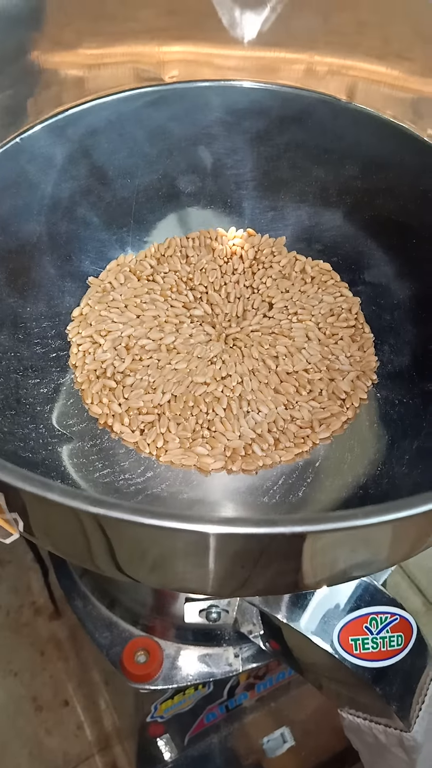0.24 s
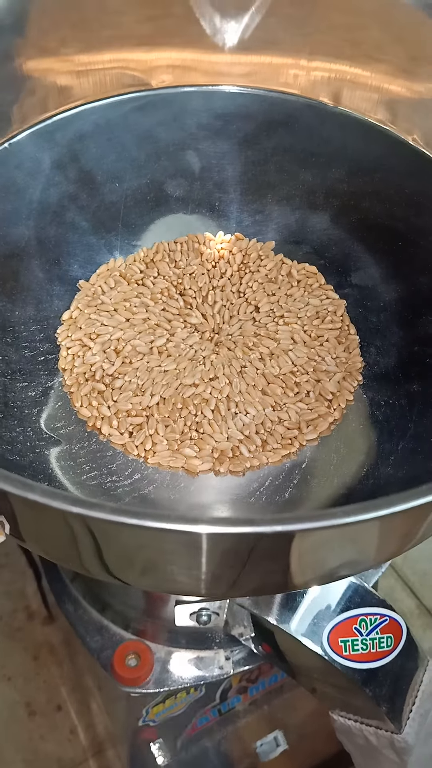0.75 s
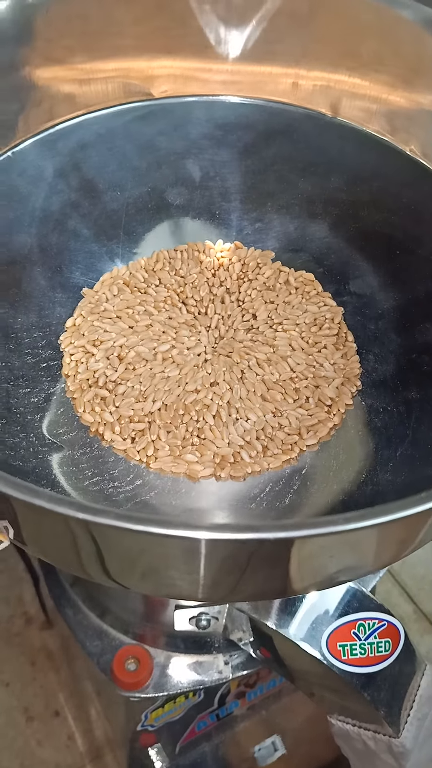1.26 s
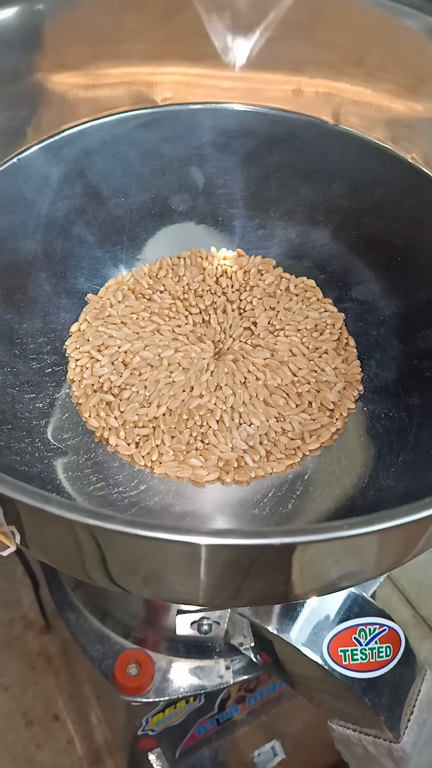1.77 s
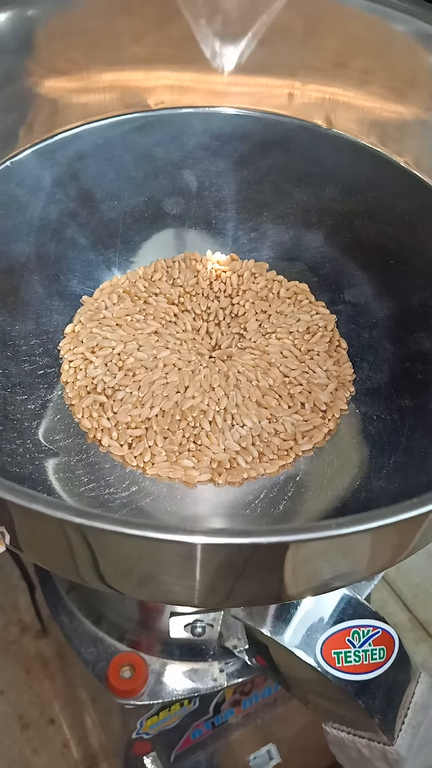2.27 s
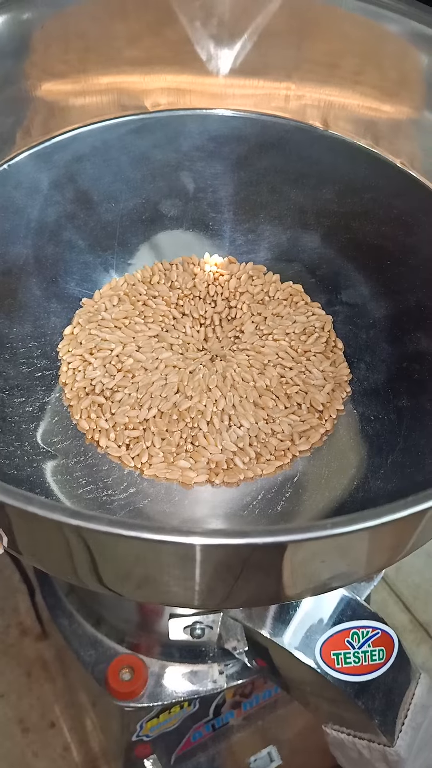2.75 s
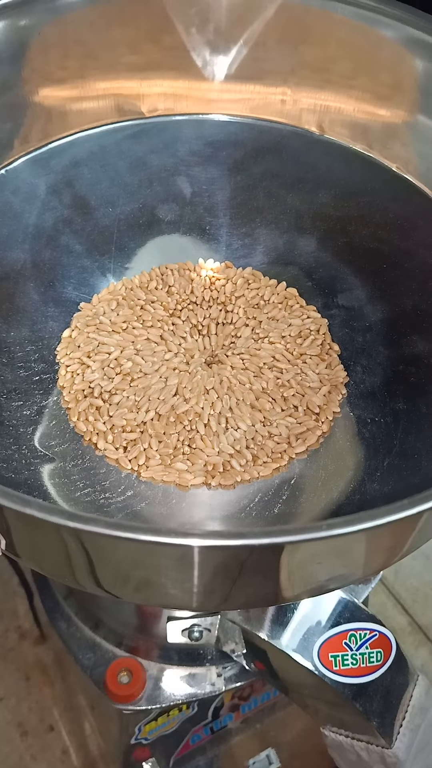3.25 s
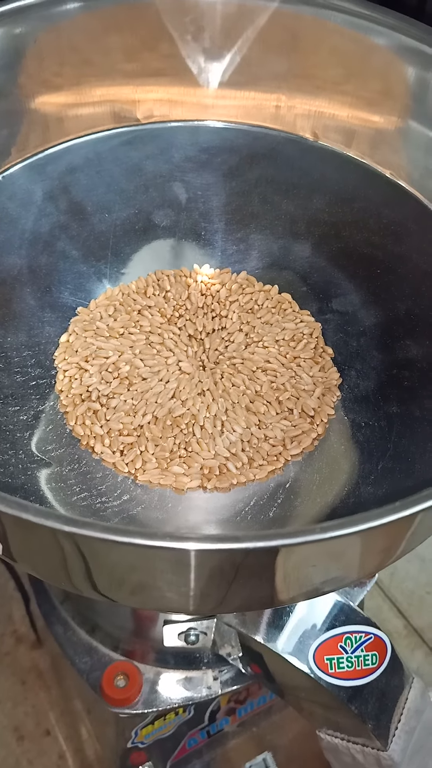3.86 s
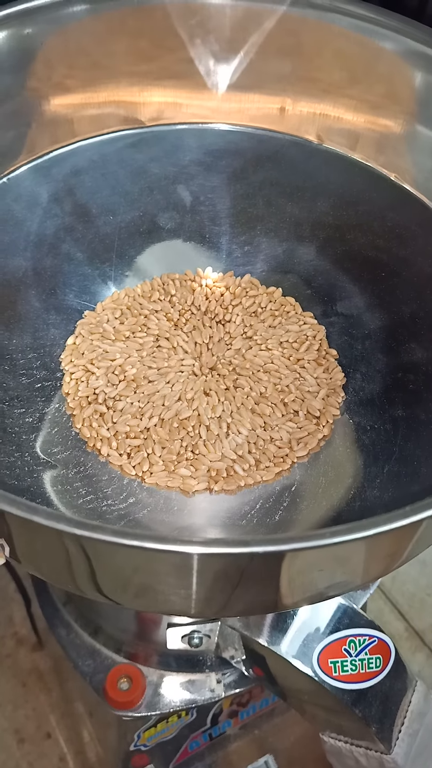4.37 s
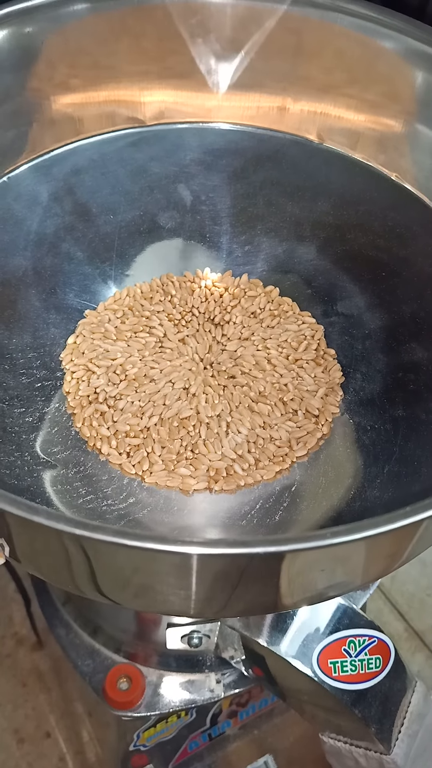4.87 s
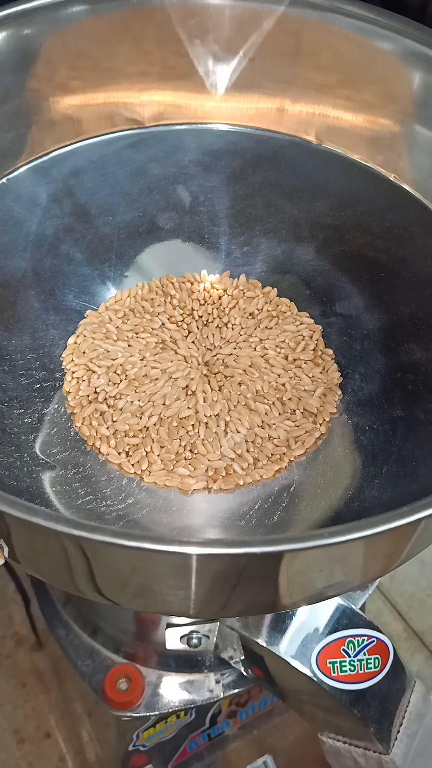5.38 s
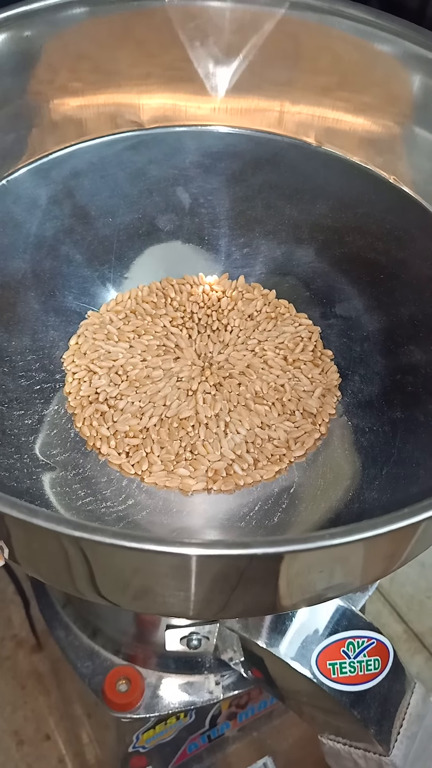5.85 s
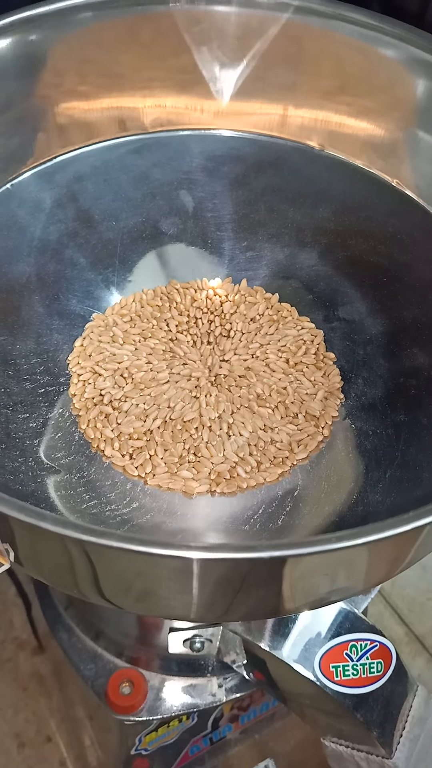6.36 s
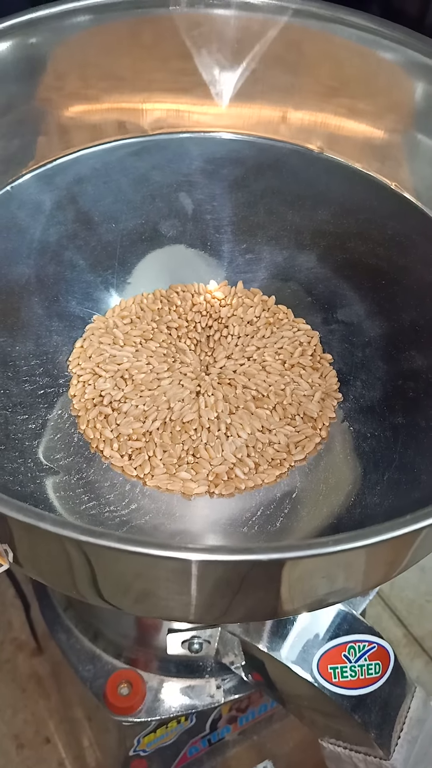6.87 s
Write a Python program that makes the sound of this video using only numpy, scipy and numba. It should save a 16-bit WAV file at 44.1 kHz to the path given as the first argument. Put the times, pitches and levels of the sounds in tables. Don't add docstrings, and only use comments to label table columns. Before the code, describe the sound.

A small electric grain mill runs steadily indoors, a hollow mid-low roar with metallic ringing, gritty hiss, dull knocks and faint crackles.

```python
import sys
import numpy as np
from scipy import signal
from scipy.fft import rfft, irfft
from scipy.io import wavfile
from scipy.ndimage import uniform_filter1d
from numba import njit

SR = 44100
rng = np.random.default_rng(int(sys.argv[2]) if len(sys.argv) > 2 else 0)


def unload_wav(signal):
    wavfile.write(
        sys.argv[1],
        SR,
        np.round(np.clip(np.atleast_2d(signal).T, -1, 1) * 32767).astype(np.int16),
    )


def nominal_scale(level):
    x = np.asarray(level, float) / 20
    return 10 ** x


N = 314022

# time_s, load_db (about the mean)
LOAD_CURVE = [(0.0, 0.5), (0.36, -0.8), (0.7, 0), (1.15, -0.2), (1.9, 0.7), (2.5, 0), (2.72, 1.5),
              (2.96, -1), (3.16, 0), (3.9, -0.4), (4.36, 0.8), (4.58, 0.3), (5.15, 0.7), (5.5, -0.2),
              (6.15, -0.4), (6.54, 0.7), (6.72, -2), (7.12, -0.8)]
# pitch_hz, width_hz, left_level_db, right_level_db,
# right_lead_rad, port_share_0_to_1 (motion common to both ports)
CHAMBER_MODES = [(254, 26, -56.5, -59.6, -0.1, 1.0), (295, 30, -49.0, -46.0, 0.2, 1.0),
                 (335, 24, -38.6, -40.2, 0.1, 0.88), (380, 36, -38.3, -47.3, -0.5, 0.89),
                 (432, 40, -35.8, -45.6, -0.4, 1.0), (474, 42, -38.2, -42.1, -0.5, 1.0),
                 (511, 32, -36.7, -39.1, -1.6, 1.0), (549, 27, -35.1, -59.9, -0.9, 1.0),
                 (582, 30, -32.7, -39.7, -0.9, 0.87), (646, 53, -45.4, -51.6, 0.7, 0.66),
                 (693, 31, -62.8, -53.4, -1.5, 1.0), (754, 71, -52.6, -56.0, 2.2, 0.18),
                 (799, 20, -52.8, -52.3, 0.3, 0.71), (845, 101, -56.1, -61.4, 0.1, 1.0),
                 (931, 111, -53.5, -56.3, 2.4, 0.25)]
HOPPER_MODES = [(1043, 118, -56.1, -56.3, -2.2, 0.43), (1112, 26, -60.6, -76.0, 0.3, 1.0),
                (1242, 31, -60.5, -63.8, 0.9, 1.0), (1315, 135, -55.2, -54.9, -3.0, 0.44),
                (1366, 35, -58.2, -56.0, 1.1, 0.46), (1418, 31, -61.3, -59.3, 1.4, 0.94),
                (1467, 26, -57.7, -64.8, -2.1, 0.8), (1538, 159, -58.9, -60.5, 2.2, 0.78),
                (1670, 103, -55.1, -58.2, 1.1, 0.17), (1759, 54, -64.0, -59.7, -3.0, 0.99),
                (1871, 120, -54.7, -56.9, -0.3, 0.39), (1920, 100, -60.9, -54.9, 1.1, 1.0),
                (2007, 93, -59.2, -52.4, -0.4, 0.71), (2066, 79, -57.1, -53.3, -1.4, 0.05),
                (2166, 78, -47.1, -49.7, -1.4, 0.55), (2242, 62, -57.1, -50.7, -0.9, 0.72),
                (2352, 175, -62.4, -58.8, 1.6, 1.0)]
NECK_MODES = [(2526, 120, -56.7, -55.1, -1.3, 0.89), (2564, 53, -71.2, -54.9, -0.3, 1.0),
              (2603, 44, -51.9, -52.0, -2.0, 1.0), (2639, 21, -62.6, -42.1, -1.4, 1.0),
              (2673, 46, -44.1, -42.6, 3.0, 1.0), (2722, 53, -49.2, -54.1, 1.1, 1.0),
              (2761, 37, -53.0, -57.7, -2.5, 1.0), (2800, 45, -58.4, -59.8, 2.9, 0.61),
              (2850, 172, -56.9, -58.3, 2.3, 0.61), (3019, 139, -67.1, -64.2, 0.8, 0.79),
              (3130, 219, -67.7, -63.1, 1.9, 0.89)]
COLLAR_MODES = [(3270, 219, -63.6, -60.6, 0.7, 0.63), (3349, 50, -67.7, -61.4, 1.4, 0.72),
                (3389, 46, -64.6, -60.9, 0.1, 1.0), (3433, 76, -56.2, -57.6, 1.4, 0.94),
                (3488, 47, -58.0, -63.2, 0.2, 0.88), (3540, 57, -67.6, -63.8, -1.9, 1.0),
                (3590, 96, -59.9, -60.4, 1.4, 0.63), (3629, 41, -63.0, -61.4, 1.7, 0.92),
                (3691, 48, -65.0, -65.4, 1.9, 0.65), (3764, 89, -71.2, -67.6, 0.5, 0.44),
                (3840, 86, -73.4, -68.4, 0.7, 1.0), (3938, 193, -68.0, -71.4, -0.1, 0.74)]
RIM_MODES = [(4192, 150, -63.5, -66, -2, 0.54), (4440, 390, -71.5, -69, -0.5, 0.99),
             (4440, 140, -70.5, -66, 3, 1), (4906, 140, -65, -73.5, 1.8, 1),
             (5400, 26, -85.5, -84, -7, 0.87), (5600, 332, -61.5, -72.5, 1.5, 0.67),
             (5950, 260, -65.5, -70, 3, 0.4), (6296, 309, -63, -68.5, 2, 0.2),
             (6708, 380, -73, -73, 4, 0.13), (7330, 322, -83, -80.5, -3.5, 0.18),
             (7800, 260, -83, -79, -0.5, 0.14), (8300, 389, -93, -86, 4, 0.49),
             (9100, 394, -92.5, -93, -1, 0.33), (9879, 476, -91, -95, 2.5, 0.28)]
# pitch_hz, left_db_per_hz, right_db_per_hz
RUSH_SPECTRUM = [(110, -104.9, -95.5), (161, -99.5, -95.5), (224, -76.5, -83), (400, -79.5, -74.5),
                 (744, -83.5, -74.5), (1150, -84, -81.5), (2400, -83.5, -79), (3100, -88.5, -85),
                 (3970, -95, -94), (6030, -96.5, -98), (6840, -118.4, -106.6), (8800, -130.7, -127.3),
                 (10500, -125.7, -127.1), (15400, -126.6, -125.5)]
# start_s, peak_db
KERNEL_CRACKS = [(0.1044, -46), (0.5302, -47), (0.7394, -43), (0.8914, -47.5), (0.9994, -46),
                 (1.0505, -45.5), (1.2894, -43.5), (1.7714, -45.5), (1.9345, -44.5), (2.1997, -46),
                 (2.378, -42.5), (2.6943, -47), (2.7144, -41), (2.7644, -44), (2.7964, -50), (2.8955, -45),
                 (3.159, -48.5), (3.176, -43.5), (3.3573, -45.5), (3.8866, -45), (4.1824, -45),
                 (4.4404, -45.5), (4.6434, -45.5), (5.0504, -46.5), (5.2344, -46), (5.2716, -46),
                 (5.8677, -44.5), (5.9638, -50.5), (6.2916, -48), (6.4906, -44.5), (6.61, -49.5)]
# start_s, peak_db, pitch_hz
KERNEL_KNOCKS = [(0.221, -23, 486), (0.3, -28, 314), (0.518, -22.5, 550), (0.553, -22, 458),
                 (0.587, -21.5, 580), (0.675, -19, 573), (0.977, -22.5, 493), (1.048, -19.5, 561),
                 (1.19, -24, 540), (1.277, -21, 583), (1.839, -19, 585), (1.934, -23.5, 486),
                 (2.092, -24.5, 455), (2.147, -19.5, 585), (2.199, -21.5, 490), (2.28, -27, 578),
                 (2.363, -22.5, 495), (2.626, -19.5, 480), (2.688, -18, 552), (2.961, -26.5, 581),
                 (2.999, -24.5, 561), (3.081, -21.5, 518), (3.138, -22.5, 447), (3.413, -25, 584),
                 (3.513, -25, 578), (3.818, -25, 388), (3.94, -27, 456), (4.015, -23, 573),
                 (4.153, -26.5, 577), (4.392, -26, 579), (4.561, -27.5, 570), (4.64, -26, 576),
                 (4.725, -25, 577), (4.867, -19, 570), (4.994, -21.5, 564), (5.159, -23, 582),
                 (5.241, -26.5, 340), (5.469, -25.5, 474), (5.653, -23.5, 564), (5.793, -21, 556),
                 (5.866, -19.5, 560), (6.1, -27.5, 490), (6.402, -21, 487), (6.484, -17.5, 562),
                 (6.576, -19, 576), (6.826, -22, 578), (6.891, -26, 558), (7.028, -25.5, 335)]

RUSH_ALIKE, RUSH_ALIKE_HZ = 1, 500
CHAMBER_FOLLOWS, HOPPER_FOLLOWS, NECK_FOLLOWS, COLLAR_FOLLOWS, RIM_FOLLOWS = 1, 0.72, 0.2, 0.6, 0.99
NECK_FREES_S, NECK_FREES_WITHIN_S, NECK_FREE_DB, NECK_DAMPS_S = 0.77, 0.15, 2, 4.1
KNOCK_RISE_S, KNOCK_STALL, KNOCK_STALL_S = 0.0065, 0.6, 0.008
KNOCK_DB, KNOCK_LEFT_DB, KNOCK_RIGHT_DB, RIGHT_LATE_S = -1.5, 3.1, -3.5, 0.00036
MIC_LOW_HZ, RUMBLE_HZ, RUMBLE_DB = 154, 100, -84
EDGE_S = 0.0007
LEAD_IN = 4096


def walk(rate_hz):
    hold = int(SR / rate_hz)
    levels = np.repeat(rng.standard_normal(N // hold + 1), hold)
    levels = uniform_filter1d(uniform_filter1d(levels, hold), hold)[:N]
    levels = levels - uniform_filter1d(levels, 4 * hold)
    return levels / levels.std()


def blows(per_s, scatter_db):
    hit, size, sign = rng.random((3, N))
    strength = nominal_scale(-scatter_db * np.log(1 - size))
    impulses = (hit < per_s / SR) * strength * np.sign(sign - 0.5)
    return impulses / impulses.std()


@njit
def ring(push, pole):
    out, first, second = np.empty(len(push), np.complex128), 0j, 0j
    for i in range(len(push)):
        first = first * pole + push[i]
        second = second * pole + first
        out[i] = second
    return out


def body(modes, drive, force, waver_hz):
    out = np.zeros((2, N))
    waver = np.exp(2j * np.pi * np.cumsum(waver_hz * walk(9)) / SR)
    force = np.r_[np.full(LEAD_IN, force[0]), force]
    for pitch_hz, width_hz, left_db, right_db, lead_rad, share in modes:
        pole = np.exp((2j * pitch_hz - width_hz) * np.pi / SR)
        fade = abs(pole) ** 2
        gain = np.sqrt(2 * (1 - fade) ** 3 / (1 + fade))
        turn = gain * np.roll(waver, rng.integers(N))
        motions = []
        for shift in rng.integers(N, size=2):
            push = np.resize(np.roll(drive, shift), len(force)) * force
            motions.append(turn * ring(push, pole)[LEAD_IN:])
        near, far = motions
        share = np.clip(share, 0, 1)
        right = share * near * np.exp(1j * lead_rad) + np.sqrt(1 - share ** 2) * far
        out[0] += nominal_scale(left_db) * near.real
        out[1] += nominal_scale(right_db) * right.real
    return out


def chamber(load_db, feed):
    force = nominal_scale(CHAMBER_FOLLOWS * load_db + 0.34 * feed + 0.13 * walk(24))
    return body(CHAMBER_MODES, blows(3000, 2.02), force, waver_hz=2.51)


def hopper(load_db, feed):
    force = nominal_scale(HOPPER_FOLLOWS * load_db + 0.3 * feed + 0.35 * walk(7))
    return body(HOPPER_MODES, blows(5000, 1.3), force, waver_hz=4.4)


def neck(load_db):
    since_s = np.arange(N) / SR - NECK_FREES_S
    freed = (1 + np.tanh(since_s / NECK_FREES_WITHIN_S)) / 2
    free_db = NECK_FREE_DB * freed * np.exp(-np.maximum(since_s, 0) / NECK_DAMPS_S)
    force = nominal_scale(NECK_FOLLOWS * load_db + free_db + 1.1 * walk(12))
    return body(NECK_MODES, blows(5000, 1.5), force, waver_hz=7.5)


def collar(load_db, feed):
    force = nominal_scale(COLLAR_FOLLOWS * load_db + 0.5 * feed + 0.5 * walk(8))
    return body(COLLAR_MODES, blows(5000, 1.7), force, waver_hz=3.0)


def rim(force):
    return body(RIM_MODES, blows(9000, 3.13), force, waver_hz=4.0)


def rush(force):
    pitch_hz, *levels_db = np.transpose(RUSH_SPECTRUM)
    f = np.fft.rfftfreq(N, 1 / SR) + 1
    left, other = rfft(rng.standard_normal((2, N)) * force)
    alike = np.clip(RUSH_ALIKE, 0, 1) / (1 + (f / RUSH_ALIKE_HZ) ** 4)
    pair = np.array([left, alike * left + np.sqrt(1 - alike ** 2) * other])
    colour = nominal_scale(np.array([np.interp(np.log(f), np.log(pitch_hz), db) for db in levels_db]))
    return irfft(pair * colour * np.sqrt(SR / 2), N)


def cracks(fade_s, usual_db, early_s):
    t = np.arange(N) / SR + early_s
    force = np.zeros(N)
    for start_s, peak_db in KERNEL_CRACKS:
        force += (t >= start_s) * nominal_scale(peak_db - usual_db) * np.exp(-np.abs(t - start_s) / fade_s)
    return force


def knocks():
    out, stall = np.zeros((2, N)), np.ones(N)
    t = np.arange(N) / SR
    port_late_s = np.array([[0], [RIGHT_LATE_S]])
    port_db = np.array([[KNOCK_LEFT_DB], [KNOCK_RIGHT_DB]])
    for start_s, peak_db, pitch_hz in KERNEL_KNOCKS:
        near = slice(int((start_s - 0.03) * SR), int((start_s + 0.05) * SR))
        age = np.maximum(t[near] - start_s + KNOCK_RISE_S / 4 - port_late_s, 0)
        swell = (age / KNOCK_RISE_S * np.exp(1 - age / KNOCK_RISE_S)) ** 2
        swing = swell * np.sin(2 * np.pi * pitch_hz * age)
        out[:, near] += nominal_scale(peak_db + KNOCK_DB + port_db) * swing
        dip = np.exp(-((t[near] - start_s - KNOCK_RISE_S / 2) / KNOCK_STALL_S) ** 2)
        stall[near] *= 1 - np.clip(KNOCK_STALL, 0, 1) * dip
    return out, stall


def scene():
    load_db = np.interp(np.arange(N) / SR, *np.transpose(LOAD_CURVE))
    feed = walk(13)
    steady = nominal_scale(RIM_FOLLOWS * load_db + 0.46 * feed + 0.6 * walk(18))
    snap = np.hypot(steady, cracks(fade_s=0.022, usual_db=-48.0, early_s=0.0024))
    knock, stall = knocks()
    mix = nominal_scale(0.12) * (chamber(load_db, feed) * stall + knock)
    mix += nominal_scale(0.2) * hopper(load_db, feed)
    mix += nominal_scale(-0.93) * neck(load_db)
    mix += nominal_scale(0.04) * collar(load_db, feed)
    mix += nominal_scale(0.15) * rim(snap)
    mix += nominal_scale(-0.2) * rush(snap)
    return mix


def top_cut(x):
    return signal.sosfilt(signal.butter(12, 15480, fs=SR, output="sos"), x)


def record(dry):
    low_cut = signal.butter(4, MIC_LOW_HZ, "high", fs=SR, output="sos")
    led_in = np.c_[dry[:, LEAD_IN:0:-1], dry]
    thin = signal.sosfilt(low_cut, led_in)[:, LEAD_IN:]
    low_pass = signal.butter(2, RUMBLE_HZ, fs=SR, output="sos")
    rumble = signal.sosfilt(low_pass, rng.standard_normal((2, N)))
    rumble = nominal_scale(RUMBLE_DB + 5.1 * walk(8.4)) * rumble / rumble.std()
    ends = np.minimum(np.arange(N), np.arange(N)[::-1]) / SR / EDGE_S
    fade = np.sin(np.pi / 2 * np.minimum(ends, 1)) ** 2
    return top_cut((thin + rumble) * fade)


dry = scene()
out = record(dry)
unload_wav(out)
```